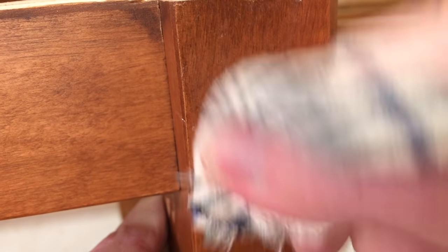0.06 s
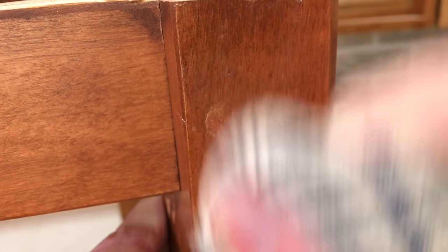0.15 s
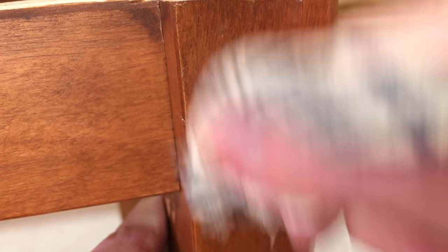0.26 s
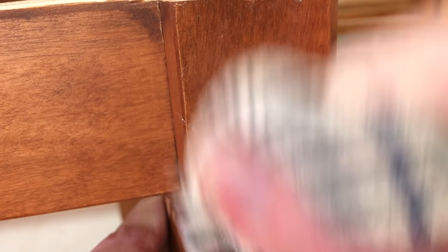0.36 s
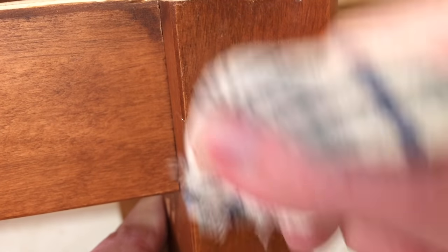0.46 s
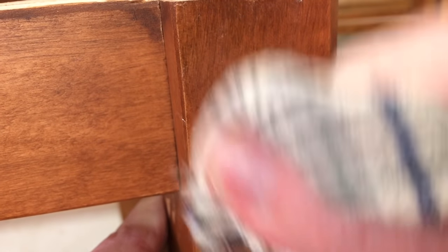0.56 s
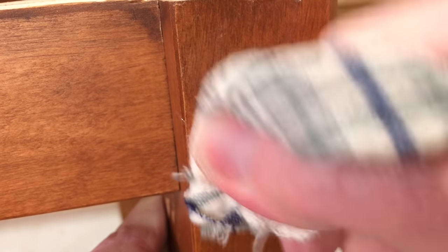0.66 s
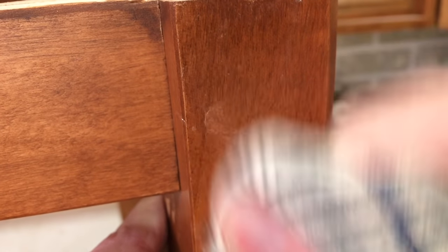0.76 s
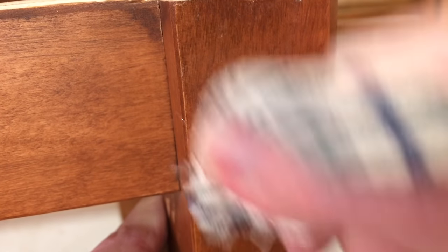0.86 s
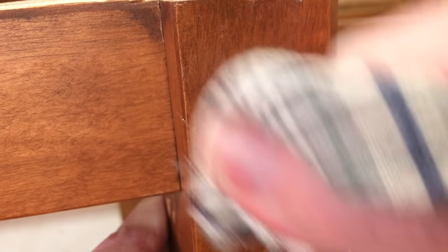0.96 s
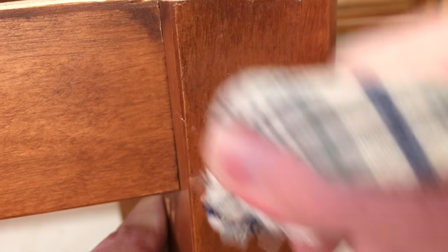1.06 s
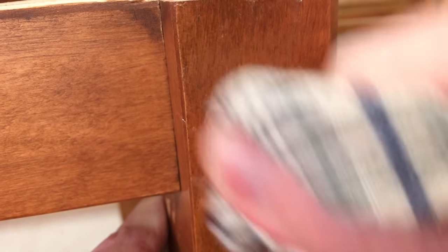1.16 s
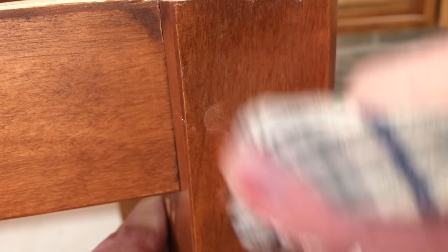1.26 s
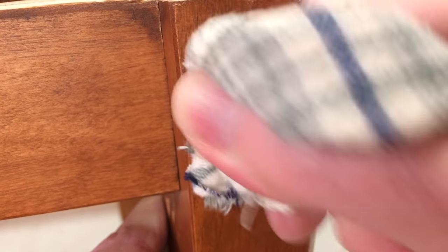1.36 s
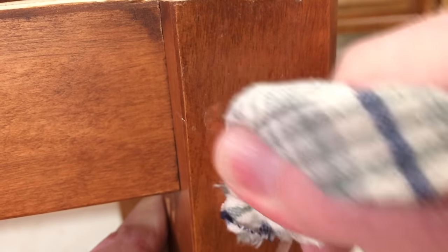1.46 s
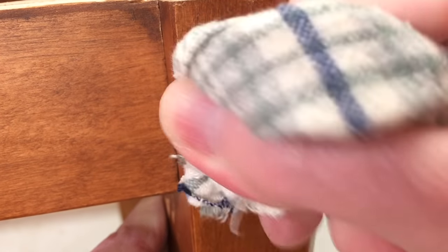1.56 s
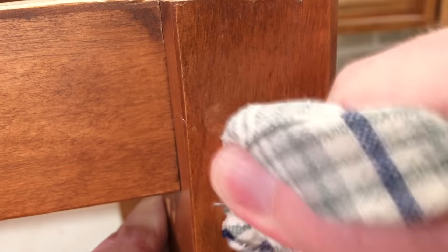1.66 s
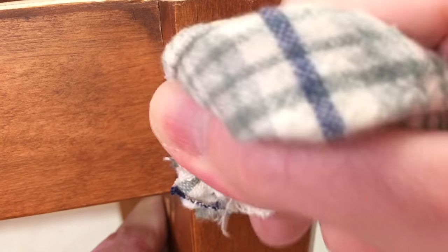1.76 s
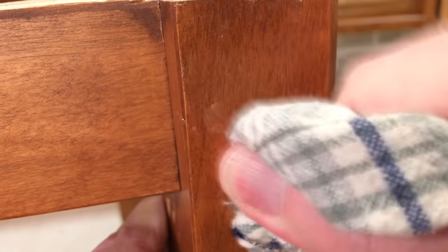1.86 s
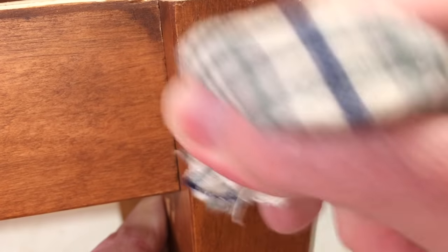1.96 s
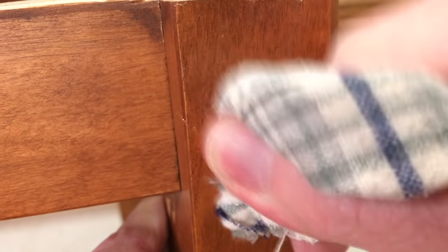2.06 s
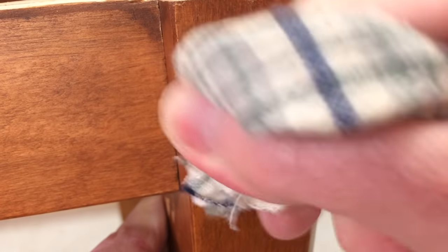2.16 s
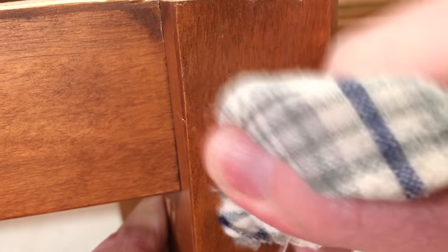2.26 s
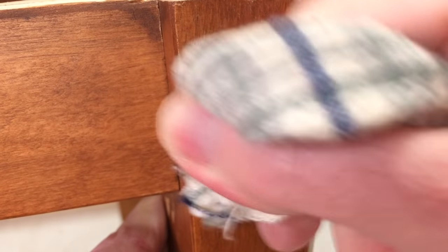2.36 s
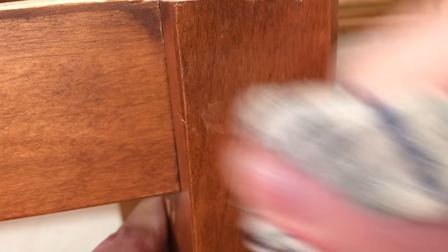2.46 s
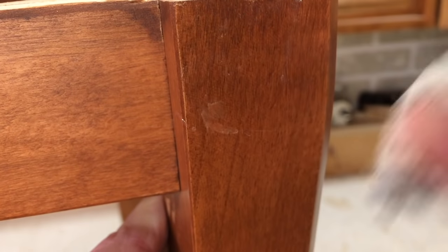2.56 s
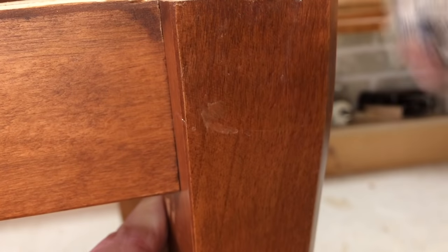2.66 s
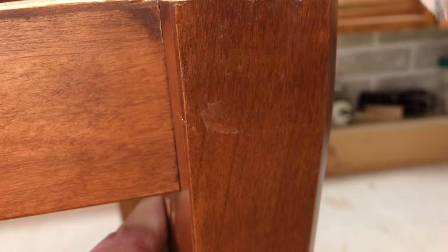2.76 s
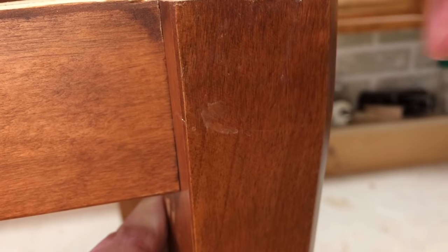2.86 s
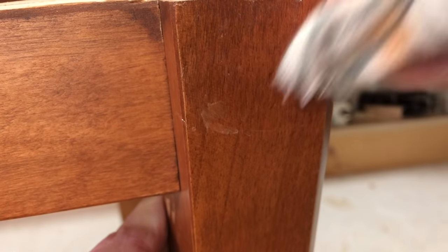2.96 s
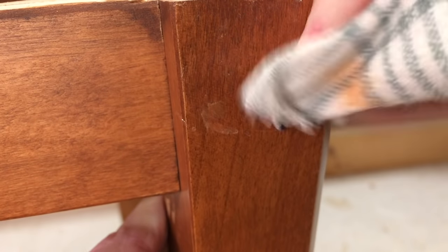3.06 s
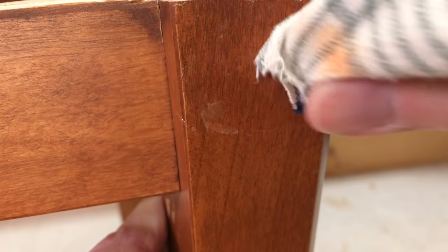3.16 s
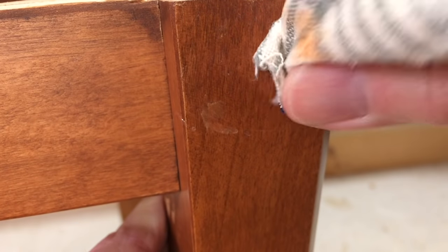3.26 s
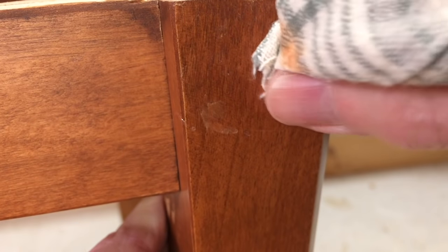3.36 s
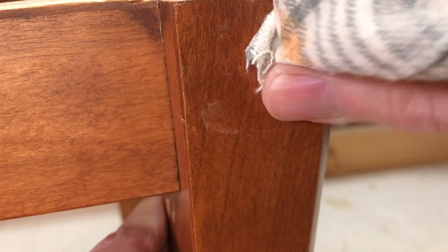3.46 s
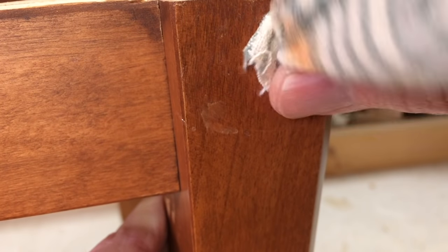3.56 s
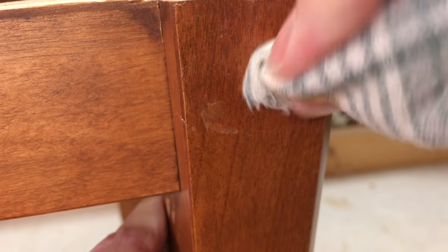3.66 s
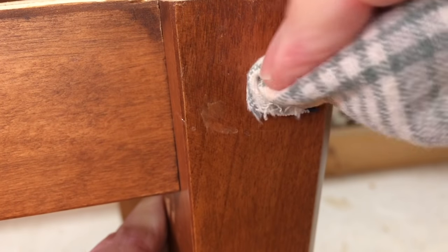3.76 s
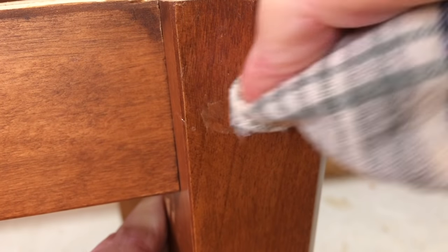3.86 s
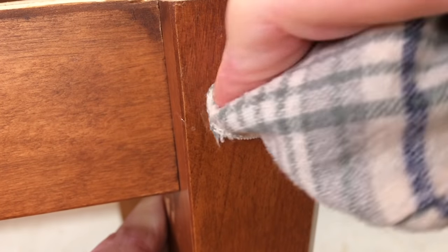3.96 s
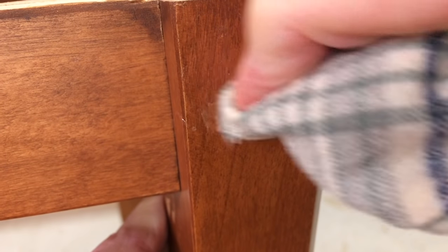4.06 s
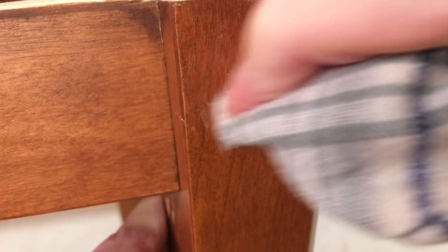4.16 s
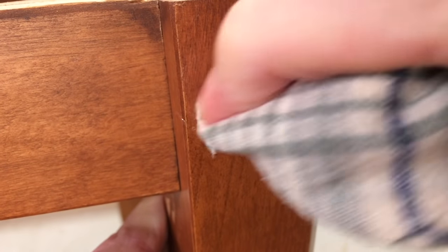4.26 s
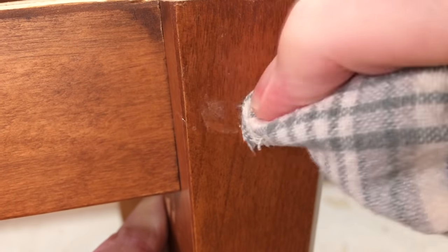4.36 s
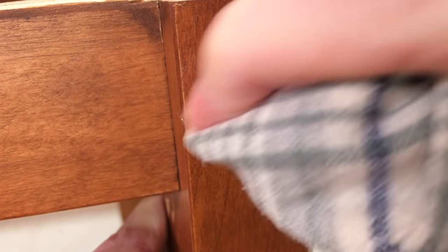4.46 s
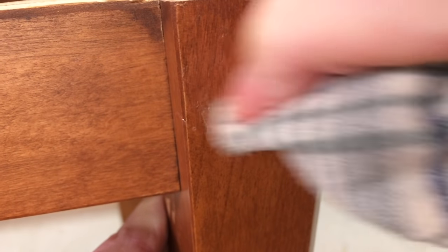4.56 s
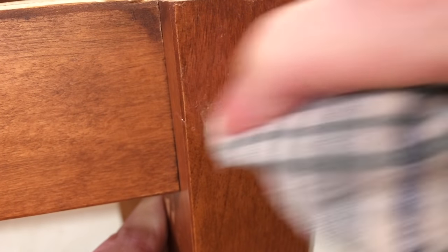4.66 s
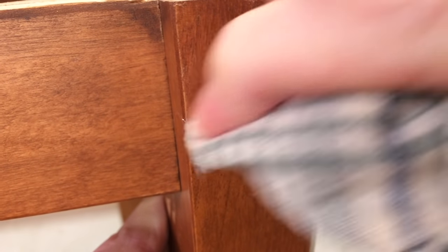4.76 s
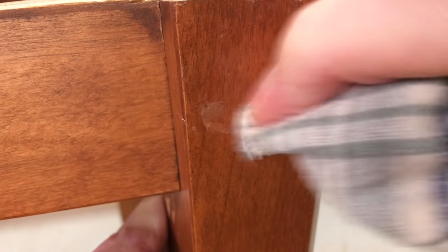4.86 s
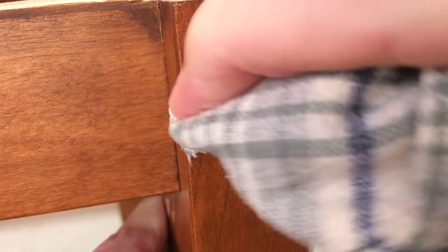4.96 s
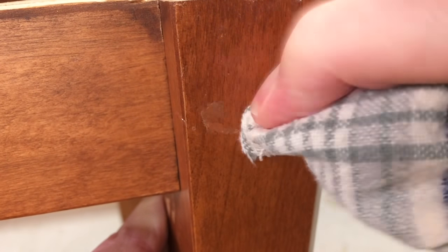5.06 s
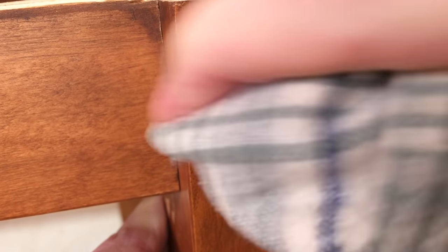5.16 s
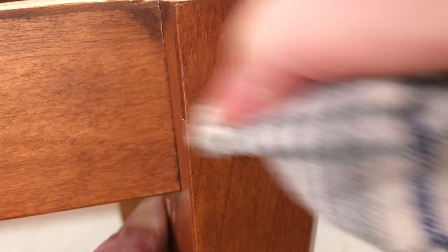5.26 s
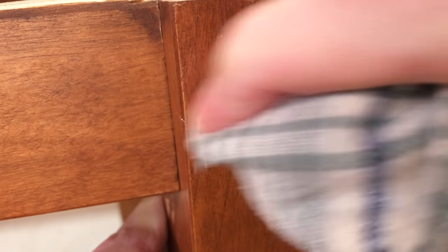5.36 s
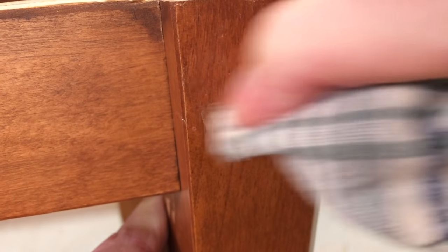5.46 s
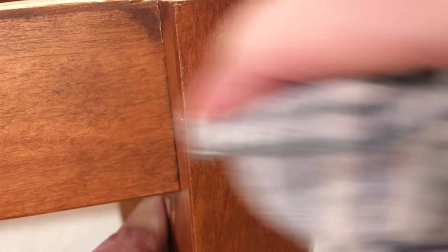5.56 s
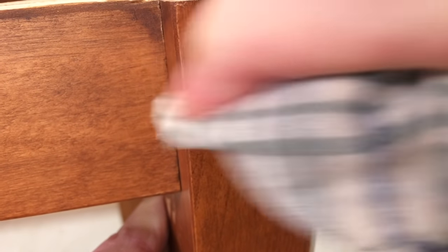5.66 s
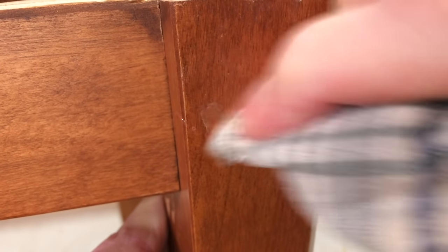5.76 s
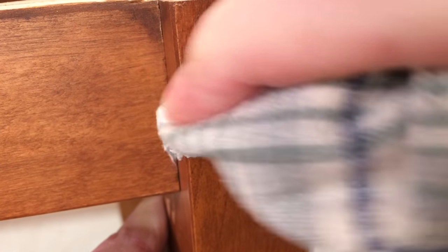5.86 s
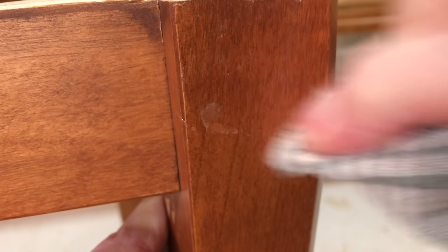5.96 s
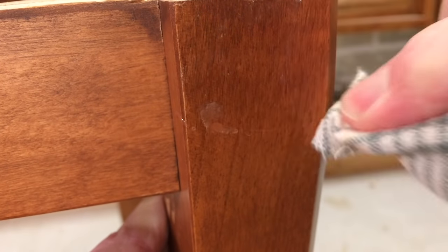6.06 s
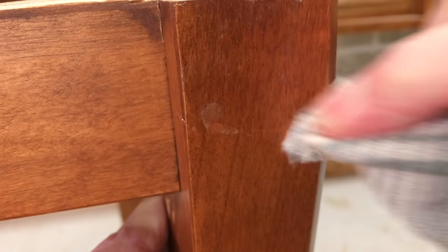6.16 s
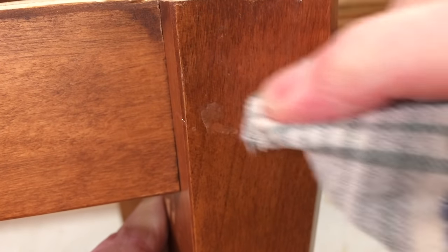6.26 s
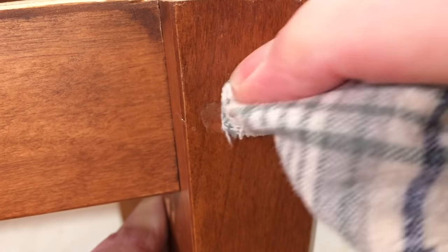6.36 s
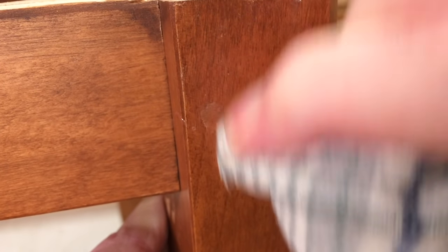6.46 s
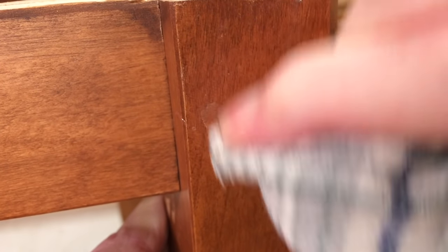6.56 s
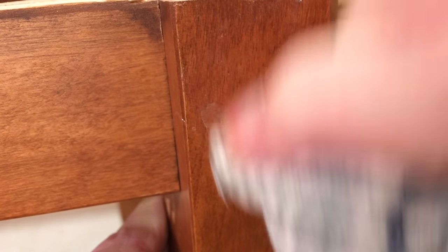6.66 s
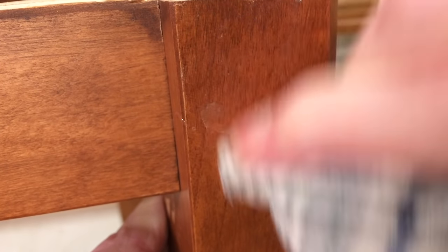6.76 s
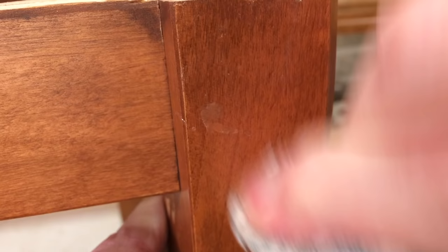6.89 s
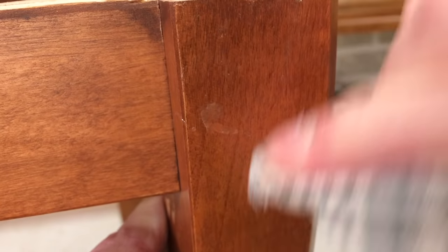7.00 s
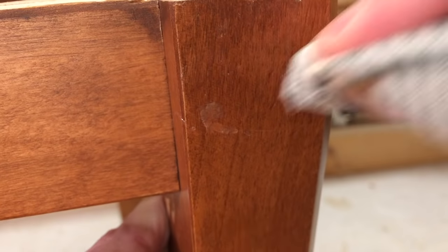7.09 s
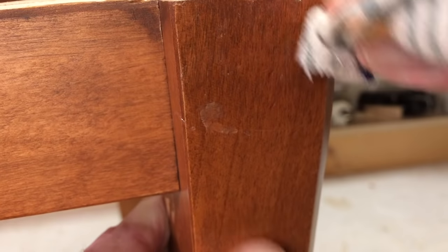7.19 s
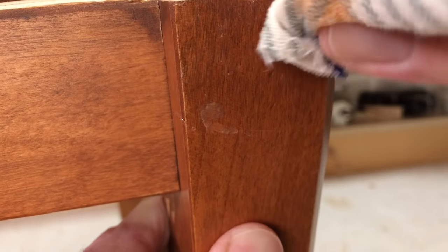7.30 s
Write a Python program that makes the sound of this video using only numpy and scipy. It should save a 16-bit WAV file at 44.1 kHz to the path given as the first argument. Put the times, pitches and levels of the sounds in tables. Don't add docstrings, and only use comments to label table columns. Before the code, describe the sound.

A very close microphone in a quiet workshop with a short room tail and faint hiss. From 0 to 2.4 seconds a flat cotton pad rubs varnished wood in rapid, even strokes, roughly ten per second, each a bright dry hiss with a hollow woody ring. The cloth catches and squeaks briefly, the chair frame judders low, and a foot drops with dull thuds, notably near 1.0, 1.5 and 1.7. From 2.45 to 4.15 the rubbing stops: faint cloth rustles, little snaps and knuckle taps, with a firmer knock around 4.0. From 4.2 to 6.0 fingertip strokes return, less hissy, scuffier and ringing brighter, with more thuds from 4.6 to 5.8. After a short rustling gap, lighter strokes run from 6.3 to 7.0, hiss growing then fading to a faint last wipe and small ticks until 7.3. Low, soft air puffs from the moving hand buffet the microphone throughout, weaker in the pauses.

```python
import sys
import numpy as np
from scipy import signal
from scipy.fft import rfft, irfft, next_fast_len
from scipy.io import wavfile
from scipy.ndimage import uniform_filter1d

SR = 44100
rng = np.random.default_rng(int(sys.argv[2]) if len(sys.argv) > 2 else 0)


def transcribe(u):
    v = np.clip(np.atleast_2d(u).T, -1, 1)
    q = np.round(v * 32767).astype(np.int16)
    wavfile.write(sys.argv[1], SR, q)


def volts(x):
    e = np.asarray(x, float) / 20
    return 10 ** e


N = 323253


def rms_one(x):
    return x / np.sqrt(np.mean(x ** 2) + 1e-20)


def evened(x, span_s):
    return x / np.sqrt(uniform_filter1d(x ** 2, size=int(span_s * SR)) + 1e-20)


def in_time(rows):
    s, *columns = np.transpose(rows)
    return [np.interp(np.arange(N) / SR, s, column) for column in columns]


def colour(x, points):
    size = next_fast_len(N)
    hz = np.arange(size // 2 + 1) * SR / size + 0.00084
    at, db = np.transpose(points)
    gain = volts(np.interp(np.log(hz), np.log(at), db))
    return irfft(rfft(x, size) * gain, size)[:N]


def drift(rate_hz):
    r = np.exp(-2 * np.pi * rate_hz / SR)
    wander = signal.lfilter([1], [1, -2 * r, r * r], rng.standard_normal(N + SR))
    return rms_one(wander[SR:])


def slips(per_s, spread_db):
    sizes = volts(spread_db * np.minimum(rng.exponential(1, N), 5))
    sizes = sizes * rng.choice([-1, 1], N)
    return sizes * (rng.random(N) < per_s / SR) + 1e-18


def resonate(x, modes):
    out = np.zeros(N)
    for k, (hz, width_hz, db) in enumerate(modes):
        r = np.exp(-np.pi * width_hz / SR)
        b = (1 - r * r) / 2 * np.array([1, 0, -1])
        a = [1, -2 * r * np.cos(2 * np.pi * hz / SR), r * r]
        out += (-1) ** k * volts(db) * signal.lfilter(b, a, x)
    return out


def leg_mode(x, hz, width_hz, db):
    once = resonate(x, [(hz, width_hz, db)])
    return resonate(once, [(hz, 1.2 * width_hz, 0)])


def swell(rows, levels_db, rise, fall, spill):
    out, t = np.zeros(N), np.arange(N) / SR
    settings = np.broadcast_arrays(levels_db, rise, fall, spill)
    for (start, length, *_), db, up, down, over in zip(rows, *settings):
        a, b = start - over, start + length + over
        i, j = max(int(a * SR), 0), min(int(b * SR), N)
        part = (t[i:j] - a) / (b - a)
        shape = np.clip(np.minimum(part / up, (1 - part) / down), 0, 1)
        out[i:j] += (volts(db) * np.sin(np.pi / 2 * shape)) ** 2
    return np.sqrt(out)


# (frequency [Hz], level [dB per Hz])
FLOOR_SPECTRUM = [(35, -57), (60, -6.5), (145, -31), (242, -30.5), (291, -34.5), (772, -38.5), (868, -34.5),
                  (1090, -41), (2000, -42), (2530, -49), (3040, -45), (3340, -47), (15500, -54)]
FLOOR_DB = -70.5


def workshop_air():
    air = colour(rng.standard_normal(N), FLOOR_SPECTRUM) * volts(0.5 * drift(5.5))
    above_rumble = signal.sosfilt(signal.butter(4, 300, "high", fs=SR, output="sos"), air)
    return volts(FLOOR_DB) * air / np.std(above_rumble)


# (time [s], shove rocking it [dB], twist in the seat rail [dB], creak in the upper frame [dB])
PAD_JOLTS = [(0.0, -32, -49, -56), (0.07, -41, -45, -58), (0.192, -40, -40, -49), (0.248, -42, -47, -51),
             (0.29, -59, -42, -56), (0.419, -40, -40, -47), (0.592, -72, -46.5, -55),
             (0.8, -60, -52.5, -54), (0.84, -37, -53.5, -60), (1.022, -45, -42, -56.5),
             (1.24, -49, -41, -52), (1.43, -50, -50.5, -56), (1.511, -37, -41, -47), (1.58, -44, -49, -68),
             (1.661, -40, -46, -48), (1.731, -34, -38.5, -55.5), (1.861, -49.5, -49.5, -55),
             (1.97, -47, -46, -52), (2.08, -40.5, -47.5, -54), (2.169, -49.5, -46.5, -53),
             (2.292, -41, -49.5, -52), (2.379, -42.5, -47.5, -58)]
TIP_JOLTS = [(4.16, -48, -81, -75), (4.43, -53, -79, -67), (4.55, -49, -69, -63),
             (4.662, -31.5, -44.5, -44.5), (4.709, -61, -55, -55), (4.893, -38, -44.5, -50.5),
             (5.108, -35, -47.5, -54), (5.348, -40, -51, -53.5), (5.399, -43, -51, -52.5),
             (5.549, -33.5, -46, -53.5), (5.59, -47, -67, -64), (5.759, -38.5, -58, -68),
             (5.96, -51, -58, -73), (6.381, -72, -53, -60), (6.48, -54, -49, -65), (6.629, -71, -49, -48.5),
             (6.718, -63, -49.5, -55), (7.11, -69, -57.5, -76)]
JOLT_HOLD_S = 0.002


def jolted(rest_db, peaks_db, rise, fall):
    power, t = volts(2 * rest_db), np.arange(N) / SR
    for (s, *_), db in zip(PAD_JOLTS + TIP_JOLTS, peaks_db):
        near = slice(max(int((s - 0.25) * SR), 0), int((s + 0.35) * SR))
        since = t[near] - s
        slope_db = np.minimum(rise * (since + JOLT_HOLD_S), fall * (JOLT_HOLD_S - since))
        power[near] += volts(2 * (db + np.minimum(slope_db, 0)))
    return 10 * np.log10(power)


# (frequency [Hz], width [Hz], level [dB])
ROCKING_MODES = [(84.8, 31.2, -2.5), (104.6, 10.6, 5), (138.2, 8.7, -0.5), (192.4, 11.2, -4)]
SEAT_RAIL_MODES = [(230, 11.4, 9), (281, 21, -8)]
UPPER_FRAME_MODES = [(333.3, 32.5, -0.5), (382.4, 29.6, -0.5), (446.8, 7.3, 2.5), (578, 27, -11)]
# (time [s], tremble [dB], upper frame's creak above it [dB])
LEAN = [(0.0, -53, -6.5), (2.35, -54, -14.5), (2.5, -63.5, -22), (2.9, -67, -3.5), (3.15, -68, -13),
        (3.7, -64, -3.5), (3.87, -61.5, -3), (4.12, -55.5, -7.5), (4.3, -58, -14), (4.7, -55, -11.5),
        (5.9, -52.5, -10), (6.1, -60.5, -11.5), (6.3, -62, -16.5), (6.5, -56, -6.5), (6.84, -54, -6),
        (7.05, -68.5, -6.5), (7.27, -68, -32), (7.33, -59, -34)]
RAIL_LEAN_DB = -10.5
# rocking, seat rail, upper frame [dB per s]
JOLT_RISE, JOLT_FALL = [430, 280, 390], [157, 276, 250]


def frame():
    lean_db, creak_db = in_time(LEAN)
    shove_db, twist_db, upper_db = np.transpose(PAD_JOLTS + TIP_JOLTS)[1:]
    parts = [(ROCKING_MODES, [70, 210], lean_db, shove_db),
             (SEAT_RAIL_MODES, [190, 300], lean_db + RAIL_LEAN_DB, twist_db),
             (UPPER_FRAME_MODES, [280, 520], lean_db + creak_db, upper_db)]
    jerks = slips(per_s=500, spread_db=3.0)
    out = np.zeros(N)
    for (modes, band_hz, rest_db, peaks_db), rise, fall in zip(parts, JOLT_RISE, JOLT_FALL):
        band = signal.butter(2, band_hz, "band", fs=SR, output="sos")
        part = signal.sosfilt(band, resonate(jerks, modes))
        out += volts(jolted(rest_db, peaks_db, rise, fall) - 3.0) * evened(part, span_s=1 / 14)
    return out


# (time [s], air push [re full scale], eddy rumble [dB])
HAND = [(0.0, 0.2, -33), (0.55, 0.35, -38.5), (1.0, 0.3, -30), (1.33, 0.16, -34.5), (1.65, 0.39, -33),
        (2.15, 0.32, -33), (2.401, 0.13, -36.5), (2.7, 0.1, -40), (3.49, 0.1, -44.5), (4.16, 0.1, -34.5),
        (4.449, 0.038, -36), (4.56, 0.069, -29), (4.67, 0.068, -32.5), (5.45, 0.15, -31),
        (5.9, 0.24, -40.5), (6.5, 0.15, -38.5), (7.19, 0.085, -42.5), (7.33, 0.06, -43)]
# (time [s], air push [re full scale])
WAVES = [(0.0, -0.035), (2.489, -0.19), (2.589, 0.15), (2.763, -0.077), (2.826, 0.077), (2.907, -0.07),
         (3.109, 0.058), (3.257, -0.04), (3.37, 0.063), (3.506, -0.04), (3.558, 0.068), (3.62, -0.095),
         (3.787, 0.082), (3.888, -0.043), (3.965, 0.041), (4.172, -0.036), (6.032, 0.12), (6.181, -0.035),
         (6.233, 0.026), (6.98, -0.055), (7.03, 0.048), (7.077, -0.031), (7.155, 0.11), (7.33, -0.087)]
PUSH_LAG_S, FIRST_PUSH = [0.048, 0.0072, 0.0012], [0.99, 0.86, -0.59]


def hand_air():
    at, reach, _ = np.transpose(HAND)
    turns = list(WAVES)
    for bout, lag, way in zip([PAD_STROKES, TIP_STROKES, LAST_STROKES], PUSH_LAG_S, FIRST_PUSH):
        for k, (s, *_) in enumerate(bout):
            turns.append((s + lag, way * (-1) ** k * np.interp(s, at, reach)))
    s, push = np.transpose(sorted(turns))
    turn = np.interp(np.arange(N) / SR, s, np.arange(len(s)))
    k = np.minimum(turn.astype(int), len(s) - 2)
    swing = push[k] + (push[k + 1] - push[k]) * (1 - np.cos(np.pi * (turn - k))) / 2
    eddy_spectrum = [(7, 6.0), (13, 20.0), (25, 6.5), (40, -8.5), (65, -11.5), (120, -65.5)]
    eddies = colour(rng.standard_normal(N), eddy_spectrum)
    return swing + volts(in_time(HAND)[1] + 8.0) * rms_one(eddies)


def patchy(x, flutter):
    out = x.copy()
    for k, low_hz in enumerate([2300, 3300, 4500, 6200, 8500]):
        region = signal.butter(2, [low_hz, 1.37 * low_hz], "band", fs=SR, output="sos")
        change = volts(1.3 * np.roll(flutter, (k + 1) * SR)) - 1
        out += signal.sosfiltfilt(region, x) * change
    return out


# (time [s], length [s], hiss level [dB], pressure as drag above the hiss [dB])
PAD_STROKES = [(0.05, 0.099, -58.5, -10.5), (0.139, 0.11, -59, 3.5), (0.247, 0.096, -57.5, -2.5),
               (0.348, 0.078, -60, 3.5), (0.459, 0.08, -59.5, -3), (0.548, 0.063, -63.5, 8),
               (0.645, 0.088, -58, -5), (0.742, 0.085, -58, -5), (0.867, 0.084, -59.5, -2),
               (0.961, 0.073, -60.5, -0.5), (1.068, 0.097, -58, -5.5), (1.17, 0.098, -56, -8),
               (1.304, 0.076, -58, -5), (1.412, 0.075, -60, -3), (1.511, 0.087, -59, -5),
               (1.617, 0.078, -59.5, 0.5), (1.725, 0.082, -58.5, -1.5), (1.829, 0.076, -58.5, -1),
               (1.934, 0.075, -58.5, -3), (2.047, 0.055, -60, -2), (2.133, 0.083, -60, -3),
               (2.244, 0.071, -61, -1.5), (2.345, 0.067, -61, -5)]
TIP_STROKES = [(4.206, 0.11, -64, 4.1), (4.298, 0.11, -64.5, 3.7), (4.453, 0.11, -62, 2.7),
               (4.556, 0.095, -65, 5.6), (4.69, 0.096, -62, 4.1), (4.787, 0.098, -62.5, 5.4),
               (4.907, 0.14, -61.5, 4.3), (5.015, 0.1, -64, 7.1), (5.149, 0.082, -62, 4.1),
               (5.241, 0.085, -68.5, 6.9), (5.364, 0.067, -60.5, 3.7), (5.43, 0.13, -61.5, 5.7),
               (5.577, 0.1, -62, 5.9), (5.687, 0.09, -61, 3.1), (5.803, 0.13, -58.5, 0.79),
               (5.918, 0.13, -72.5, 9.4)]
LAST_STROKES = [
    (6.329, 0.14, -64, 3.5),
    (6.459, 0.12, -62.5, 2.5),
    (6.561, 0.11, -61, 0),
    (6.667, 0.11, -59, -1),
    (6.756, 0.13, -59.5, -1.5),
    (6.847, 0.15, -70.5, 4.5),
]
RUSTLES = [(2.458, 0.13, -80, 14), (2.778, 0.051, -70.5, -0.5), (2.975, 0.063, -67, -5),
           (3.351, 0.089, -71.5, 5), (3.52, 0.2, -69.5, 0), (3.685, 0.18, -70.5, -5),
           (3.786, 0.17, -80.5, 16.5), (3.955, 0.2, -69.5, 8.5), (4.078, 0.06, -68.5, 7),
           (6.091, 0.12, -71.5, 5), (6.182, 0.092, -70.5, -2), (7.043, 0.13, -83, 11),
           (7.162, 0.08, -70.5, -22)]
# (frequency [Hz], level [dB per Hz])
WEAVE_SPECTRUM = [(1500, -10.5), (2500, -6), (3500, -5), (4300, -2.5), (4950, -2.5), (5600, -2.5),
                  (7200, -2), (9500, -3.5), (12000, -6), (14000, -11.5), (15800, -9.5)]
# (frequency [Hz], level [dB per Hz])
SCUFF_SPECTRUM = [(350, -7), (620, 1), (800, -3.5), (1100, -5), (1550, -6), (2900, -9.5), (3600, -12.5),
                  (6000, -24.5), (12000, -33)]
# (frequency [Hz], width [Hz], level [dB])
LEG_MODES = [(925, 55, -3), (1018, 60, 1), (1080, 45, -4), (2000, 100, -14), (2500, 100, -15),
             (2790, 80, -12), (2942, 60, -12), (4400, 120, -17), (4920, 100, -13), (5520, 100, -16)]
RING_DB, RING_FOLLOWS = [-10.5, -10, -17, -10], 0.74
PAD_BITE_DB_PER_S = 4.5
BITE_DB, BITE_LAG_S, BITE_S = 1, 0.0046, 0.0022
REGRIP_S = 3.5
TIP_BRIGHT_DB = 6.0


def rag():
    bouts = [PAD_STROKES, TIP_STROKES, LAST_STROKES, RUSTLES]
    strokes = sum(bouts, [])
    start, length, hiss_db, scuff_db = np.transpose(strokes)
    pad = slice(len(PAD_STROKES))
    ring_db = np.repeat(RING_DB, [len(bout) for bout in bouts]) + RING_FOLLOWS * scuff_db
    ring_db[pad] += PAD_BITE_DB_PER_S * start[pad]
    flat = start < REGRIP_S
    flick = np.where(flat, 0.14, 0.36)
    slow = np.where(flat, 0.5, 0.8)

    flutter = drift(21.5)
    fibres = rms_one(colour(slips(per_s=15000, spread_db=3.0), WEAVE_SPECTRUM))
    fibres = patchy(fibres, flutter) * volts(0.78 * flutter)
    dull = signal.sosfiltfilt(signal.butter(1, 8500, fs=SR, output="sos"), fibres)
    hiss = dull * swell(strokes, hiss_db + 0.39, rise=flick, fall=slow, spill=np.where(flat, 0.004, 0.01))
    hiss += (fibres - dull) * swell(strokes, hiss_db, rise=flick, fall=1.52 * slow,
                                    spill=np.where(flat, 0.0, -0.0078))

    scuff = evened(colour(slips(per_s=6500, spread_db=2.0), SCUFF_SPECTRUM), span_s=0.015)
    scuff = scuff * volts(2.7 * drift(27))
    scuff = scuff * swell(strokes, hiss_db + scuff_db, rise=0.66, fall=0.95, spill=0.013)

    drag = slips(per_s=6000, spread_db=3.0)
    grip = swell(strokes, hiss_db + ring_db, rise=0.15 * flick, fall=1.0, spill=0.00033)
    bites = [(s + BITE_LAG_S, BITE_S) for s in start[pad]]
    grip += swell(bites, (hiss_db + ring_db)[pad] + BITE_DB, rise=0.065, fall=1.0, spill=0)
    bright_db = TIP_BRIGHT_DB * (np.arange(N) > REGRIP_S * SR)
    ring = np.zeros(N)
    for hz, width_hz, db in LEG_MODES:
        mode = leg_mode(drag * grip * volts(2.9 * drift(9.0)), hz, width_hz, db)
        ring += mode * volts((hz > 1900) * bright_db)
    steady_ring = sum(leg_mode(drag, *mode) for mode in LEG_MODES)
    return hiss + scuff + ring / np.std(steady_ring)


# (time [s], level [dB], t60 [s], low notes above the leg's ring [dB])
CATCHES = [(0.06, -64.5, 0.29, -2), (0.175, -58, 0.4, 1), (0.269, -54, 0.058, -9), (0.48, -64, 0.2, -10),
           (0.551, -64, .15, -4), (0.787, -66, 0.22, 10.5), (0.886, -56.5, 0.15, -16),
           (0.966, -66.5, 0.14, 4), (1.082, -57, 0.12, -4), (1.191, -69, 0.71, 4.5), (1.31, -82, 0.26, 12),
           (1.43, -58, 0.21, 0.5), (1.616, -65.5, 0.18, 4), (1.654, -56.5, 0.16, -15),
           (1.726, -55, 0.18, -22), (1.83, -67, 0.22, -8), (1.941, -66.5, 0.26, 4), (2.05, -63.5, 0.45, -1),
           (2.157, -58, 0.15, -13), (2.257, -66, 0.14, -4), (2.35, -57, 0.1, -3.5), (4.713, -79, .15, -8),
           (4.76, -57.5, 0.16, 2), (4.849, -60, 0.26, -9), (4.98, -57.5, 0.22, 6), (5.055, -61, 0.31, -4),
           (5.189, -66, 0.22, -14), (5.505, -60, 0.17, -2), (5.742, -67, 0.15, 7), (5.82, -79, 0.15, -6),
           (6.475, -65, 0.13, -14), (6.604, -59.5, 0.23, -21), (6.684, -57.5, 0.12, -6),
           (6.805, -57, 0.077, -3)]
# (frequency [Hz], width [Hz], level [dB])
LOW_LEG_MODES = [(566, 67, 6.5), (684, 62, 8.5), (826, 22, 8.5)]
CATCH_ATTACK_S = 0.002


def catches():
    drag, t = slips(per_s=5000, spread_db=2.5), np.arange(N) / SR
    main = evened(sum(leg_mode(drag, *mode) for mode in LEG_MODES[:3]), span_s=0.037)
    low = evened(resonate(drag, LOW_LEG_MODES), span_s=0.051)
    edge = rms_one(colour(drag, SCUFF_SPECTRUM))
    out = np.zeros(N)
    for s, db, t60, low_db in CATCHES:
        near = slice(int(s * SR), int((s + 0.2) * SR))
        since = t[near] - s
        grip = volts(db - 60 * since / t60) * np.clip(since / CATCH_ATTACK_S, 0, 1)
        scrape = volts(-0.3 - 360 * since) * edge[near]
        out[near] += grip * (main[near] + volts(low_db) * low[near] + scrape)
    return out


# (time [s], length [s], pitch
# [Hz], width [Hz], level [dB])
SQUEAKS = [(0.17, 0.1, 1650, 350, -61), (0.3, 0.12, 5000, 700, -66), (0.37, 0.09, 235, 30, -45),
           (0.386, 0.08, 1620, 300, -61), (0.39, 0.07, 2900, 200, -66), (0.49, 0.05, 5000, 500, -65),
           (0.55, 0.13, 1500, 700, -63), (0.735, 0.05, 235, 40, -48), (0.82, 0.04, 410, 60, -52),
           (1.08, 0.09, 235, 30, -51), (1.18, 0.13, 232, 25, -47), (1.19, 0.07, 445, 30, -56),
           (1.43, 0.045, 590, 90, -59), (1.825, 0.04, 240, 40, -47), (1.852, 0.045, 585, 70, -54),
           (1.89, 0.06, 600, 90, -61), (2.05, 0.09, 480, 200, -55), (2.06, 0.05, 1015, 60, -59),
           (1.515, 0.07, 1000, 150, -60), (2.35, 0.07, 340, 100, -56), (2.26, 0.05, 620, 100, -60),
           (2.14, 0.04, 240, 40, -46), (2.57, 0.11, 4500, 4500, -67), (3.365, 0.072, 218, 40, -59),
           (3.78, 0.07, 410, 90, -61), (3.8, 0.06, 1700, 120, -74), (3.875, 0.04, 1720, 80, -66),
           (3.91, 0.04, 1740, 90, -71), (3.96, 0.1, 2900, 150, -70), (4.04, 0.1, 1700, 150, -68),
           (5.15, 0.12, 230, 30, -54), (5.69, 0.045, 450, 40, -55), (5.86, 0.045, 370, 40, -59),
           (6.33, 0.13, 225, 30, -53), (6.605, 0.06, 400, 70, -54), (6.68, 0.07, 232, 30, -47),
           (6.8, 0.07, 590, 60, -55), (6.89, 0.09, 1680, 100, -69), (6.9, 0.07, 430, 50, -63)]
# (time [s], length [s], pitch [Hz], level [dB])
HIGH_SQUEAKS = [(0.734, 0.063, 2870, -65), (1.42, .05, 2890, -65), (1.612, 0.12, 2850, -62),
                (1.833, 0.091, 2800, -66), (2.047, .04, 2930, -64), (2.056, .05, 4920, -65),
                (2.16, 0.055, 4950, -66), (2.168, .055, 2060, -69), (2.249, 0.047, 3000, -61.5),
                (4.928, 0.045, 2900, -61.5), (5.05, 0.065, 3020, -61), (5.17, 0.06, 2940, -61),
                (5.496, 0.043, 2860, -67), (5.59, 0.055, 3080, -67), (5.707, .05, 2750, -69),
                (5.806, 0.11, 2860, -61), (6.467, .065, 3210, -65), (6.79, .05, 3100, -69)]
HIGH_SQUEAK_WIDTH_HZ = 260


def squeaks():
    out, drag = np.zeros(N), slips(per_s=2500, spread_db=3.0)
    high_squeaks = [(s, length, hz, HIGH_SQUEAK_WIDTH_HZ, db) for s, length, hz, db in HIGH_SQUEAKS]
    for start, length, hz, width_hz, db in SQUEAKS + high_squeaks:
        tone = evened(leg_mode(drag, hz, width_hz, 0), span_s=0.048)
        out += tone * swell([(start, length)], [db], rise=0.53, fall=1.0, spill=0)
    return out


def cracks(rows):
    out, size = np.zeros(N), SR // 10
    grain = rng.standard_normal((len(rows), size))
    for (s, db, low_hz, high_hz, t60), noise in zip(rows, grain):
        band = signal.butter(3, [low_hz, high_hz], "band", fs=SR, output="sos")
        gain = np.sqrt(SR / 2 / (high_hz - low_hz))
        blow = noise * volts(-60 * np.arange(size) / SR / max(t60, 0.004))
        blow[0] = 0.92 * gain
        i = round(s * SR)
        out[i:i + size] += volts(db - 1.0) * gain * signal.sosfilt(band, blow)[:N - i]
    return out


# (time [s], level [dB], lowest [Hz], highest [Hz], t60 [s])
THUDS = [(0.172, -52, 161, 327, 0.14), (1.004, -43.5, 160, 323, 0.1), (1.497, -39, 151, 288, 0.073),
         (1.7, -42, 130, 317, 0.11), (4.641, -38, 128, 327, 0.12), (4.685, -41, 141, 282, 0.093),
         (4.874, -39.5, 132, 330, 0.087), (4.92, -44.5, 131, 237, 0.12), (5.07, -45, 140, 307, 0.1),
         (5.336, -43.5, 138, 263, 0.14), (5.526, -41.5, 130, 289, 0.16), (5.76, -45, 132, 250, 0.13)]


def foot_thuds():
    return cracks(THUDS)


# (time [s], level [dB], lowest [Hz], highest [Hz], t60 [s])
TICKS = [(1.403, -50.5, 454, 1550, 0.035), (2.508, -56.5, 293, 674, 0.033),
         (2.522, -55.5, 580, 2190, 0.033), (2.797, -61, 900, 5500, 0.03),
         (2.938, -48.5, 5460, 11700, 0.0091), (3.39, -63, 2500, 7000, 0.046),
         (2.99, -59, 2000, 12800, 0.037), (2.999, -58, 2000, 13000, 0.03), (3.043, -60, 300, 2330, 0.037),
         (3.273, -66, 695, 5030, 0.012), (3.616, -53.5, 263, 584, 0.045), (3.616, -53, 900, 6000, 0.014),
         (3.666, -50, 330, 1930, 0.016), (3.688, -59, 250, 1000, 0.02), (3.688, -60, 1500, 4200, 0.015),
         (3.711, -58, 1200, 4500, 0.0093), (3.716, -54.5, 500, 2300, 0.011),
         (4.031, -41.5, 123.8, 1910, 0.016), (4.282, -46.5, 199, 770, 0.035),
         (4.531, -52.5, 348, 2500, 0.13), (4.999, -49.5, 476, 2220, 0.059), (5.697, -50.5, 590, 880, 0.027),
         (5.955, -54, 417, 1070, 0.043), (5.973, -49, 230, 1700, 0.09), (7.095, -64, 1480, 7000, 0.024)]


def taps_and_snaps():
    return cracks(TICKS)


def workshop_tail(x, t60, wet_db, wall_hz):
    t = np.arange(SR // 2) / SR
    tail = rng.standard_normal(len(t)) * volts(-60 * t / t60) * (t > 0.006)
    wet_gain = volts(wet_db) / np.sqrt(np.sum(tail ** 2))
    tail = signal.sosfilt(signal.butter(2, wall_hz, fs=SR, output="sos"), tail)
    return wet_gain * signal.fftconvolve(x, tail)[:N]


def scene():
    chair = rag() + taps_and_snaps() + squeaks()
    room = workshop_tail(chair, t60=0.41, wet_db=-6, wall_hz=7700)
    mix = chair + room + frame() + hand_air() + workshop_air() + catches() + foot_thuds()
    return mix[None]


HOLES_FROM_HZ, HOLE_SHARE = 12600, 0.1


def starved_top(x):
    hz, t, z = signal.stft(x, SR, nperseg=1024)
    band = np.maximum((hz - HOLES_FROM_HZ) // 350 + 1, 0).astype(int)
    luck = rng.standard_normal((band.max() + 1, len(t)))
    luck = uniform_filter1d(luck, size=5, axis=1) * np.sqrt(5)
    limit = np.interp(np.arange(band.max() + 1), [0, 1, 7, 40], [-9, -2.0, -2 * HOLE_SHARE, -2 * HOLE_SHARE])
    keep = np.where(luck < limit[:, None], volts(-22), 1)
    lost = signal.istft(z * (1 - keep[band]), SR, nperseg=1024)[1][..., :N]
    return x - lost


def band_limit(x):
    return signal.sosfilt(signal.butter(12, 15660, fs=SR, output="sos"), x)


def record(dry):
    cut = signal.cheby2(16, 60, 15950, fs=SR, output="sos")
    settled = signal.sosfilt_zi(cut)[:, None, :] * dry[None, :, :1]
    finished = signal.sosfilt(cut, starved_top(dry), zi=settled)[0]
    return band_limit(finished)


dry = scene()
out = record(dry)
transcribe(out)
```